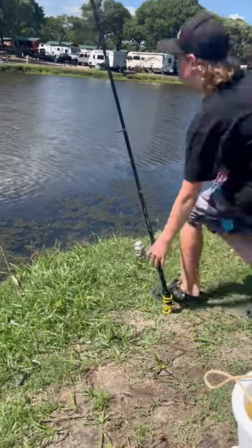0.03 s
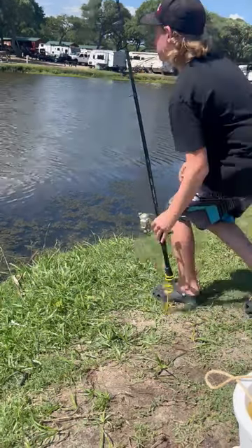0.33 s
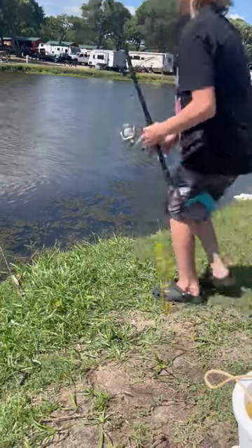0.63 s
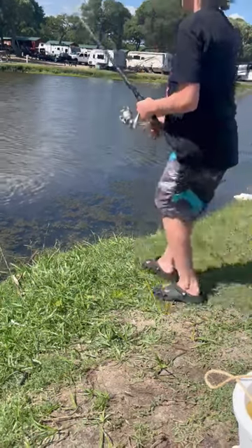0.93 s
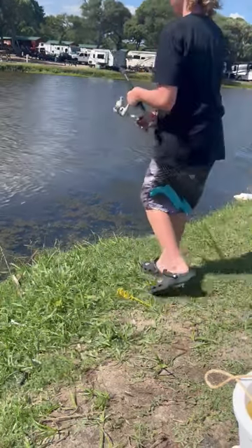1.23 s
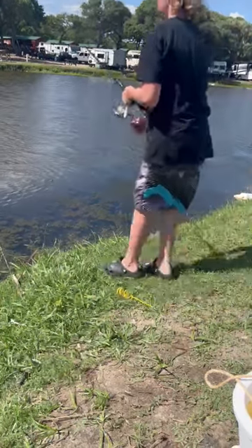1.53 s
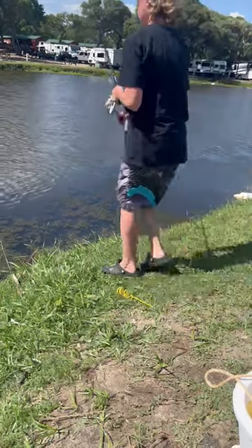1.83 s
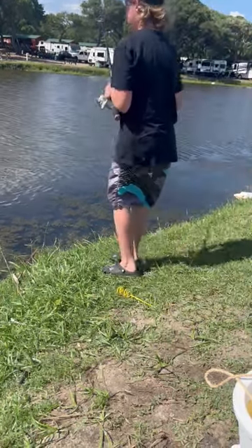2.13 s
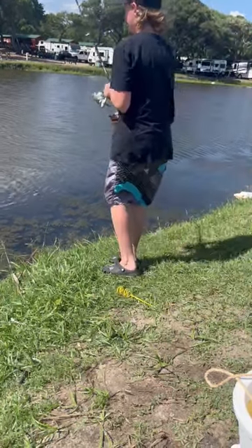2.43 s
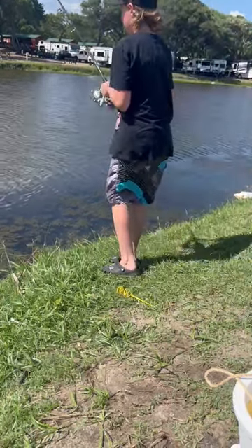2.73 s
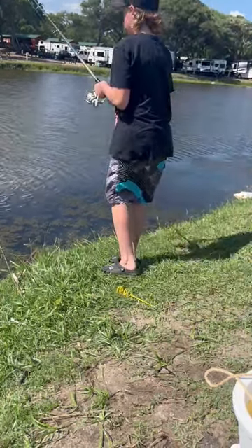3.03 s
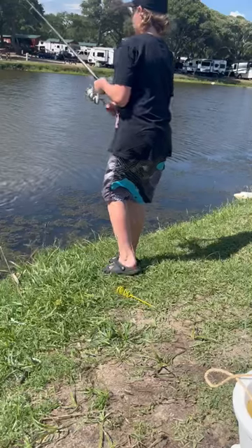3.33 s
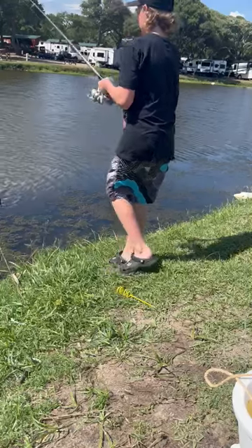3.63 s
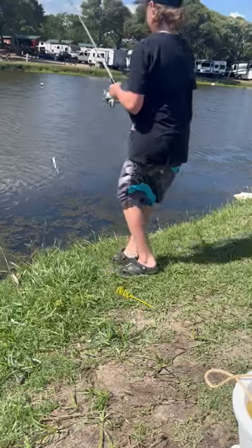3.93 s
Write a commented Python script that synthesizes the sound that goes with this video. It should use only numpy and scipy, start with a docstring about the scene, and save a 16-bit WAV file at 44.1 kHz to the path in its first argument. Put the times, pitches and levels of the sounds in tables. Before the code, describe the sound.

Wind buffeting the microphone by a pond while someone quietly handles a fishing rod.

```python
"""Gusty wind buffets a phone on a grassy pond bank: a low rumble, with dull pops as eddies hit its ports.
A few steps away an angler pulls a rod from its ground holder with a hiss and a thin friction squeak,
steps through rustling grass and handles the reel, which clicks and knocks.
Something chirps twice far away, over the steady hiss of far trees and rippled water."""
import sys
import numpy as np
from scipy import signal
from scipy.fft import rfft, irfft
from scipy.io import wavfile
from scipy.ndimage import uniform_filter1d

SR = 44100
rng = np.random.default_rng(int(sys.argv[2]) if len(sys.argv) > 2 else 0)


def dump(signal):
    """Clip the signal to [-1, 1] and save it as 16-bit WAV at the path in sys.argv[1]."""
    limited = np.clip(np.atleast_2d(signal).T, -1, 1)
    pcm = np.round(limited * 32767).astype(np.int16)
    wavfile.write(sys.argv[1], SR, pcm)


N = 176400

# Wind strength right at the phone, on the open bank: time_s, relative_level_db
GUSTS = [(0,-40.5), (.11,-49.5), (.33,-42), (.41,-44), (.48,-49.5), (.8,-49), (.92,-42.5), (1.17,-44.5),
         (1.21,-32.5), (1.28,-38.5), (1.41,-40.5), (1.46,-32.5), (1.55,-29), (1.6,-37), (1.8,-39),
         (2.0,-41.5), (2.05,-34), (2.125,-49), (2.175,-41), (2.2,-28), (2.29,-36.5), (2.334,-33),
         (2.36,-43.5), (2.39,-35), (2.45,-42), (2.51,-32), (2.92,-34.5), (3.02,-36), (3.15,-34.5),
         (3.186,-38), (3.22,-28.5), (3.35,-32.5), (3.41,-42), (3.54,-36.5), (3.57,-34.5), (3.68,-40.5),
         (3.76,-50), (3.88,-39.5), (3.91,-37), (3.965,-29), (4,-47.5)]
# Colour of the wind on the microphone: frequency_hz, gain_db
RUMBLE_SPECTRUM = [(15, -24.5), (30, -25), (48, -2.5), (64, -1), (100, -4.5), (160, -11), (300, -22.5),
                   (550, -48), (1000, -49.5), (2500, -83.5)]


def wind(t):
    """Rumble and small fluttering eddies follow the gusts; both channels share the deepest part."""
    f, gust_db = freqs(), np.interp(t, *np.array(GUSTS).T)
    rumble = noise(colour(RUMBLE_SPECTRUM), side=0.45 * f / np.hypot(f, 60))
    rumble_db = gust_db + 3.5 + 2.5 * wander(22.03)
    flutter_db = 6.5 * np.minimum(wander(50), 1.37)  # capped, so small eddies stay small
    eddies = noise(band(f, low_hz=161, high_hz=423, order=4.2), side=0.44, drive=undb(flutter_db))
    eddy_db = gust_db.mean() + 0.69 * (gust_db - gust_db.mean()) - 9.5
    return rumble * undb(rumble_db) + eddies * undb(eddy_db)


# Strong eddies striking the microphone: start_s, length_s, relative_peak_db, upper_edge_hz
STRONG_EDDIES = [(.272, 0.0028, -27.5, 390), (1.207, 0.026, -27, 250), (1.269, 0.0019, -18.5, 540),
                 (1.313, 0.0024, -21, 500), (1.433, 0.012, -14.5, 223), (1.451, 0.0046, -20, 424),
                 (1.49, 0.0045, -14, 636), (1.498, 0.014, -16.5, 370), (1.533, 0.0037, -12, 630),
                 (1.543, 0.0025, -17.5, 520), (1.607, 0.0025, -20, 576), (1.779, 0.0033, -21, 646),
                 (1.819, 0.0008, -19, 555), (1.843, .0031, -23, 416), (1.911, 0.0042, -22.5, 540),
                 (2.022, 0.0029, -20.5, 533), (2.038, 0.0099, -21, 450), (2.174, .003, -21, 443),
                 (2.187, 0.0026, -16, 800), (2.196, 0.0022, -9, 560), (2.204, 0.017, -13, 680),
                 (2.221, 0.0089, -12.5, 468), (2.23, 0.0073, -9, 480), (2.239, .011, -15.5, 375),
                 (2.588, 0.012, -26, 420), (2.62, 0.059, -28.5, 387), (2.726, .002, -28, 600),
                 (2.735, 0.01, -17, 358), (2.784, 0.0029, -9, 392), (2.789, .003, -9, 175),
                 (2.842, 0.0034, -25, 640), (2.873, 0.011, -25, 510), (2.981, .0074, -27.5, 350),
                 (3.091, 0.0058, -25.5, 402), (3.129, 0.011, -23.5, 373), (3.226, .017, -18.5, 616),
                 (3.32, 0.0091, -23, 535), (3.452, 0.0086, -20, 370), (3.561, 0.0083, -19, 322),
                 (3.615, 0.0096, -17.5, 358), (3.682, .0032, -28.5, 380), (3.954, 0.0026, -24.5, 487),
                 (3.956, 0.0025, -15, 220)]


def buffets(size=8192, count=24, pulses_per_s=220, release_s=0.0028):
    """A strong eddy is one pressure pulse or a short uneven volley, rounded by the port to a dull pop."""
    out = np.zeros((2, N))
    low_cut = signal.butter(2, 85, "high", fs=SR, output="sos")
    for start, length, db, edge_hz in STRONG_EDDIES:
        gaps = 0.5 + rng.random(count)
        scatter, side, sign = rng.standard_normal((3, count))
        pulse_s = (np.cumsum(gaps) - gaps[0]) / pulses_per_s
        envelope = np.exp(-np.maximum(pulse_s - length, 0) / release_s)
        balance = (1 + 0.36 * np.array([side, -side])) * pan_right(db=1)
        pressure = envelope * np.sign(sign) * undb(2 * scatter) * balance
        pulses = np.zeros((2, size))
        positions = np.minimum(pulse_s * SR, size - 1).astype(int)
        pulses[:, positions] = unit(pressure) * np.sqrt(np.mean(envelope ** 2))
        port = np.vstack([signal.butter(5, edge_hz, fs=SR, output="sos"), low_cut])
        pop_peak = np.abs(signal.sosfilt(port, signal.unit_impulse(size))).max()
        add(out, start, undb(db - 4) * signal.sosfilt(port, pulses) / pop_peak)
    return out


# Steps in the grass and moving clothes, a few steps from the phone: start_s, length_s, level_db
STEPS = [(0, 0.12, -59), (0.398, 0.043, -61), (0.754, 0.13, -56), (0.926, 0.087, -68), (1.122, 0.059, -63),
         (1.435, 0.11, -58), (1.613, 0.065, -65), (1.81, 0.19, -67), (2.004, 0.081, -60.5),
         (3.227, 0.24, -66.5), (3.552, 0.14, -67)]
# Colour of grass and cloth at that distance: frequency_hz, gain_db
GRASS_SPECTRUM = [(500, -17), (1500, 11.5), (2500, 2.5), (4000, 4.5), (5200, 0.5), (6300, -11.5),
                  (8000, -4.5), (10500, -11.5), (12500, -14), (16000, -10)]


def grass_steps(t, snaps_per_s=62, snap_decay_s=0.0015):
    """Grass and cloth rustle unevenly, and single blades crackle as they snap."""
    envelope = sum(undb(db) * swell(t - start, length, attack_s=0.0076, release_s=0.055)
                   for start, length, db in STEPS)
    spectrum, width = colour(GRASS_SPECTRUM), colour(BANK_WIDTH)
    rustle = noise(spectrum, width, drive=undb(1.5 * wander(300))) * pan_right(db=2)
    snaps = (rng.random(N) < snaps_per_s / SR) * undb(10 * rng.random(N))
    snap_decays = signal.lfilter([1], [1, -np.exp(-1 / (snap_decay_s * SR))], snaps)
    crackle = noise(spectrum, width, drive=snap_decays)
    return envelope * (rustle + undb(-6.5) * crackle)


# The reel in the angler's hands, a few steps away: start_s, level_db
REEL_CLICKS = [(.088, -61), (1.1374, -50.5), (1.1405, -59), (2.0238, -58), (3.2435, -74), (3.255, -64.5),
               (3.2934, -74), (3.3583, -77)]
# Resonances of its metal parts: pitch_hz, gain_db, t60_s
REEL_MODES = [(3920, -6, .012), (5140, -2.5, .008), (7100, -2, 0.0044), (9300, -6, 0.0053),
              (10540, -4, 0.0097), (11100, 4, 0.0099), (11440, 4, .009), (14300, -10, .007)]


def reel_clicks(crack_decay_s=0.003):
    """Each brief contact rings the reel's metal, with a bright crack of noise on top."""
    out = np.zeros((2, N))
    for start, db in REEL_CLICKS:
        metal = ring(REEL_MODES, contact_s=0.00075)
        bright_noise = np.diff(rng.standard_normal(len(metal) + 1)) / 2
        crack = bright_noise * np.exp(-np.arange(len(metal)) / SR / crack_decay_s)
        add(out, start, undb(db) * (metal + undb(-1) * crack))
    return out


# Rod and reel handle knocking, at the same spot: start_s, pitch_hz, level_db, t60_s
ROD_KNOCKS = [(0.088, 4160, -59, 0.0064), (1.653, 2000, -54, .03), (1.655, 3950, -57, .015),
              (2.027, 1730, -48.5, 0.0093)]


def rod_knocks():
    """A softer, longer contact rings one resonance, duller than the clicks."""
    out = np.zeros((2, N))
    for start, hz, db, t60 in ROD_KNOCKS:
        knock = np.array([ring([(hz, 0, t60)], contact_s=0.0046) for _ in range(2)])
        add(out, start, undb(db) * knock * pan_right(db=-0.5))
    return out


# Rod sliding from its holder and line brushing the guides, nearby: start_s, length_s, level_db
ROD_SLIDES = [(0, 0.029, -63.5), (0.19, 0.33, -70), (0.277, 0.17, -76.5), (.54, 0.39, -75),
              (0.948, 0.025, -62.5), (1, .38, -77.5), (3.325, 0.4, -80), (1.403, 0.275, -70.5),
              (1.728, 0.5, -72.5), (1.956, 0.012, -61), (3.238, 0.018, -66)]
# Colour of that sliding at the phone: frequency_hz, gain_db
SLIDE_SPECTRUM = [(3000, -9.5), (6500, 1), (9800, 2.5), (12500, 0.5), (15600, 0), (17000, -18)]


def rod_slides(t):
    """Sliding tackle makes a thin hiss that wavers as it catches."""
    envelope = sum(undb(db) * swell(t - start, length, attack_s=0.012, release_s=0.017)
                   for start, length, db in ROD_SLIDES)
    catch_db = 1.1 * wander(200) + 1.9 * wander(30)
    return envelope * noise(colour(SLIDE_SPECTRUM), side=0.054, drive=undb(catch_db))


# Resonances of the rod leaving its ground holder on the bank: pitch_hz, width_hz, gain_db
SQUEAK_MODES = [(9200, 90, -3), (10000, 130, -5), (13400, 120, -10), (14700, 80, -2), (15500, 130, -2)]


def rod_squeak(t, start_s=0.27, length_s=0.19, level_db=-70.5):
    """Friction rings a few narrow, very high resonances of the sliding rod."""
    resonances = sum(undb(db) / (1 + (2 * (freqs() - hz) / width) ** 2) for hz, width, db in SQUEAK_MODES)
    envelope = swell(t - start_s, length_s, attack_s=0.081, release_s=0.015)
    return undb(level_db) * envelope * noise(resonances, side=0.1)


# Calls far from the phone, perhaps a water bird: start_s, length_s, pitch_hz, level_db
FAR_CHIRPS = [(0.417, 0.02, 1165, -49), (.935, 0.018, 1780, -57)]


def far_chirps(t):
    """Each short call is a wavering tone that rises a little, swells and fades."""
    out = 0
    for start, length, hz, db in FAR_CHIRPS:
        progress = np.clip((t - start) / length, 0, 1)
        pitch_hz = hz * (1 + 0.021 * progress + 0.0078 * wander(150))
        envelope = swell(t - start, length, attack_s=0.017, release_s=0.012)
        out = out + undb(db) * envelope * np.sin(2 * np.pi * np.cumsum(pitch_hz) / SR)
    return out


# Far trees and rippled water, heard from the bank: frequency_hz, gain_db
POND_SPECTRUM = [(40, -17), (150, -9), (400, -0.5), (700, -4), (1100, -9), (1800, -13), (2700, -16.5),
                 (4500, -24.5), (5300, -24), (6200, -27.5), (8000, -34.5), (10500, -38), (12500, -46.5),
                 (16000, -55)]
# Stereo width of this hiss and of the grass at the phone: frequency_hz, side_gain_db
BANK_WIDTH = [(100, -16.5), (500, -1), (1000, 0.5), (2000, -8), (4500, 0.5), (6000, -33), (8000, -31.5),
              (16000, -33)]


def trees_and_water():
    """Far trees and ripples blend into a wide, smooth hiss that barely swells."""
    hiss = noise(colour(POND_SPECTRUM), colour(BANK_WIDTH))
    return hiss * undb(-50 + 0.5 * wander(4.87)) * pan_right(db=1)


def undb(db):
    """Decibels to gain."""
    return 10 ** (np.asarray(db) / 20)


def unit(x):
    """Scale to rms 1."""
    return x / np.sqrt(np.mean(x ** 2) + 1e-30)


def freqs():
    """Frequency of each spectral bin in Hz."""
    return np.maximum(np.arange(N // 2 + 1) * SR / N, 1)


def colour(points):
    """Gain per bin from (frequency_hz, gain_db) points."""
    hz, db = np.array(points, float).T
    return undb(np.interp(np.log(freqs()), np.log(hz), db))


def band(f, low_hz, high_hz, order):
    """Gain of a band with a soft lower edge; order sets how steep the upper edge is."""
    return 1 / np.sqrt((1 + (low_hz / f) ** 4) * (1 + (f / high_hz) ** (2 * order)))


def noise(gain, side, drive=1):
    """Coloured stereo noise of rms 1; side scales the part that differs between the channels."""
    shared, apart = rfft(rng.standard_normal((2, N)) * drive) * gain
    return unit(irfft(np.array([shared + side * apart, shared - side * apart]), N))


def wander(rate_hz):
    """Smooth random drift of rms 1."""
    hold = max(int(SR / rate_hz), 2)
    stairs = np.repeat(rng.standard_normal(N // hold + 1), hold)
    return unit(uniform_filter1d(stairs, hold)[:N])


def swell(t, length_s, attack_s, release_s):
    """Attack, hold, exponential release."""
    return np.clip(t / attack_s, 0, 1) * np.exp(-np.maximum(t - length_s, 0) / release_s)


def pan_right(db):
    """Left and right gains, with the right db above the left."""
    return undb(np.array([[-db], [db]]) / 2)


def add(out, start_s, x):
    """Mix a short sound in at a time."""
    i = max(int(start_s * SR), 0)
    out[:, i:i + x.shape[-1]] += x[..., :max(N - i, 0)]


def ring(modes, contact_s, size=6000):
    """Modes rung by a brief scratchy contact; rms 1 over the first 10 ms."""
    t = np.arange(size) / SR
    push = rng.standard_normal(size) * np.exp(-t / contact_s)
    ringing = np.zeros(size)
    for hz, db, t60 in modes:
        mode = np.sin(2 * np.pi * hz * t) * np.exp(-np.log(1000) * t / t60)
        ringing += undb(db) * unit(signal.fftconvolve(push, mode)[:size])
    return ringing / np.sqrt(np.mean(ringing[:440] ** 2))


def ports(x, left_lead_rad):
    """Sound meets the two microphone ports out of step: turn their phases apart, bin by bin."""
    return irfft(rfft(x) * np.exp(0.5j * np.array([left_lead_rad, -left_lead_rad])), N)


# Phase between the phone's two ports for sound from the bank: frequency_hz, left_lead_rad
BANK_PHASE = [(100, -0.5), (600, -0.54), (1000, 0), (1900, 0.46), (2950, 3), (4400, 0), (5300, 2),
              (5900, 3), (6600, 3.5), (7200, 5), (8300, 6.5), (10000, 7), (11900, 9.5), (13200, 17),
              (14600, 13.5), (16000, 12)]


def scene():
    """Wind on the microphone ports, over the angler and the distant sounds of the pond."""
    t = np.arange(N) / SR
    blown = wind(t) + buffets()
    bank = trees_and_water() + grass_steps(t) + rod_slides(t) + rod_squeak(t)
    bank += reel_clicks() + rod_knocks() + far_chirps(t)
    wind_phase = -1.78 * np.tanh(freqs() / 286)  # the wind reaches the right port first
    bank_phase = np.interp(freqs(), *np.array(BANK_PHASE).T)
    return ports(blown, wind_phase) + ports(bank, bank_phase)


def record(dry, top_hz=15800):
    """The phone cuts the top steeply."""
    return signal.sosfilt(signal.ellip(10, 0.2, 80, top_hz, fs=SR, output="sos"), dry)


dry = scene()
out = record(dry)
dump(out)
```